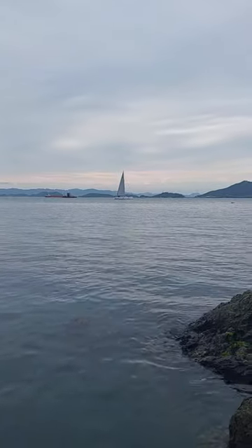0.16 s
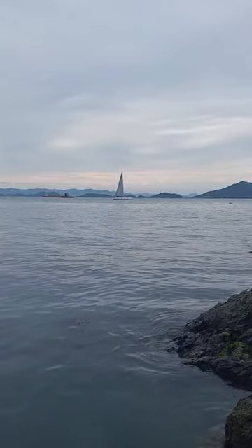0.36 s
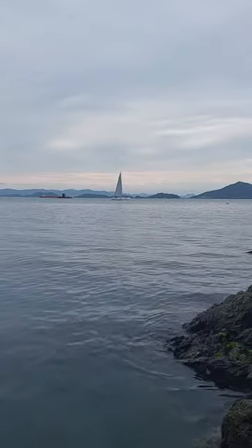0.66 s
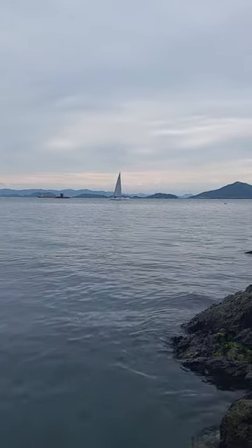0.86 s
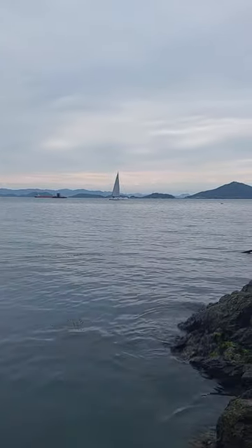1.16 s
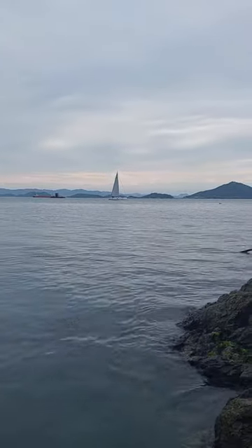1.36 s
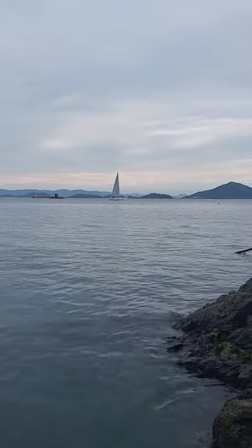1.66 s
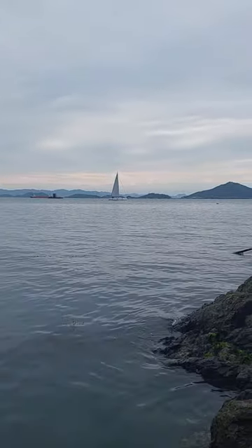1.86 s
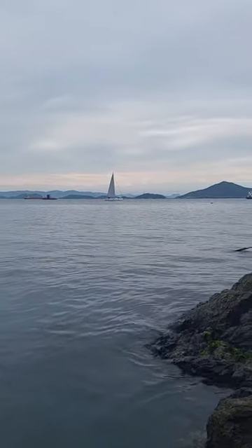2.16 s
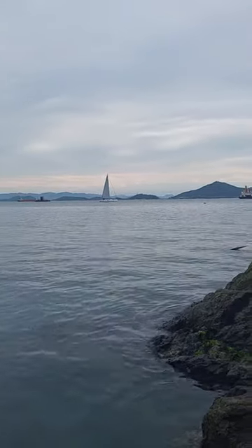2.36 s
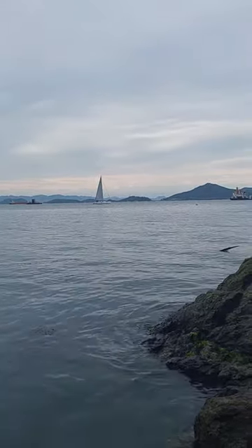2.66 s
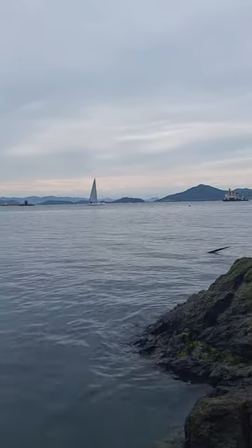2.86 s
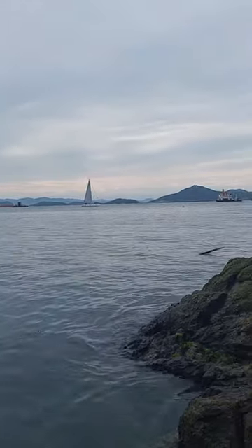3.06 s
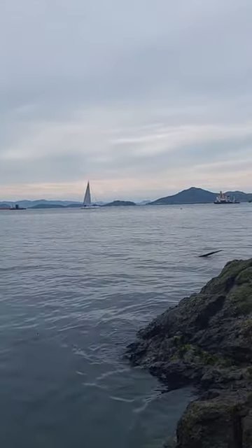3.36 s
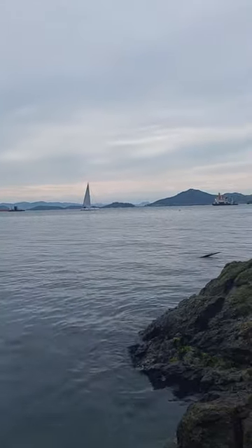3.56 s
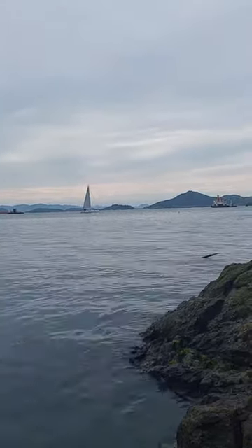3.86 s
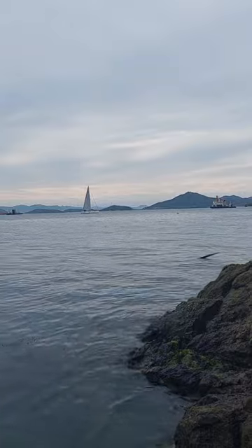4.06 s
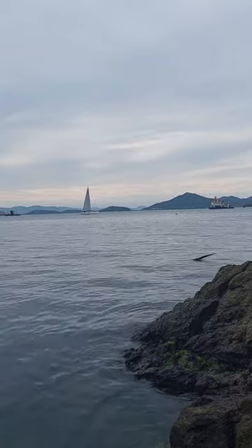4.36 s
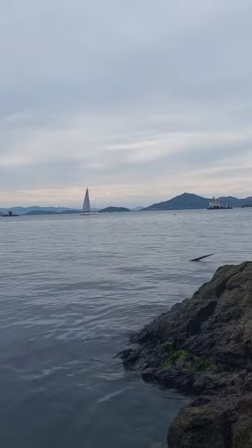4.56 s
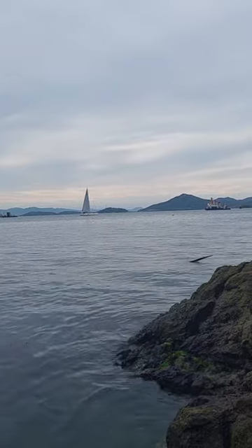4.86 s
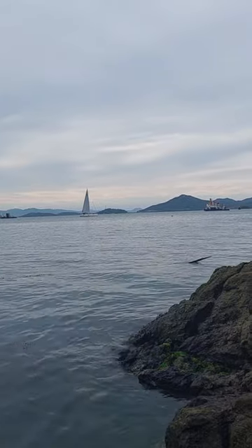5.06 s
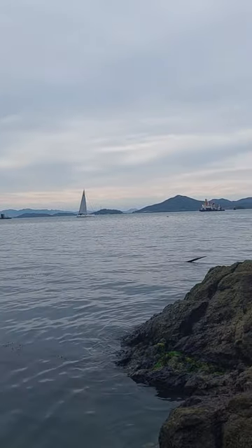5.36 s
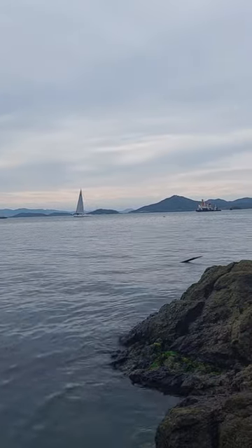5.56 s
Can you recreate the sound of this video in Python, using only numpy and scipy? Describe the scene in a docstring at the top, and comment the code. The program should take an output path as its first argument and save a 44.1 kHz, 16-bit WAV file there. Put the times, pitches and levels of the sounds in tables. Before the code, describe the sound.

Small waves lap and gurgle against a rock with bubbly plips and droplets, over a distant ship engine's low, wavering hum.

```python
"""A ship's engine hums and rumbles across a bay as small waves lap against a rock on the right, on a calm shore.
Two wavering tones in dull noise make the ship. Each lap folds air into the water: decaying sines ring as bubbles,
most rising in pitch, in swarms and singly, and random flurries of pops fizz as spray on the stone.
Narrow noise swells briefly on gliding pitches, droplets crack and splash, and hollows gulp.
Rock echoes, a far wash, a faint hiss and a light breeze fill the space."""
import sys
import numpy as np
from scipy import signal
from scipy.fft import rfft, irfft
from scipy.io import wavfile
from scipy.ndimage import uniform_filter1d

SR = 44100
rng = np.random.default_rng(int(sys.argv[2]) if len(sys.argv) > 2 else 0)


def bounce(signal):
    """Save signal as a 16-bit WAV file at the path given by the first command-line argument."""
    frames = np.transpose(np.atleast_2d(signal))
    limited = np.clip(frames, -1, 1)
    pcm = np.round(limited * 32767).astype(np.int16)
    wavfile.write(sys.argv[1], SR, pcm)


N = 251370
TIME = np.arange(N) / SR

# The ship's hum swelling and fading over the water, before a common trim and random fades:
# (time [s], firing line level [dB], octave line level [dB])
HUM_LEVELS = [(0.05, -46.5, -36), (0.18, -50, -49), (0.3, -54, -60), (0.55, -47, -46.5), (0.78, -52, -51),
              (0.87, -57, -38.5), (0.95, -66, -49), (1.01, -62, -33), (1.1, -67, -48), (1.27, -59, -55.5),
              (1.37, -45, -43), (1.55, -51, -45.5), (1.72, -49.5, -55), (1.85, -50.5, -49.5),
              (2.06, -55, -47), (2.25, -70, -76), (2.68, -61, -47.5), (2.83, -64, -61),
              (3.05, -50.5, -50.5), (3.35, -51, -48.5), (3.88, -56.5, -59.5), (4.8, -54.5, -43.5),
              (5.12, -52, -46.5), (5.25, -76, -73), (5.48, -57, -42), (5.7, -55, -56)]
# A rumble over the water that dies away, before its own small swells: (time [s], level [dB])
RUMBLE_LEVELS = [(0.05, -45), (0.5, -49), (1.0, -46.5), (1.38, -48.5), (1.6, -52), (1.95, -55.5),
                 (2.3, -58), (2.8, -64), (3.3, -55.5), (3.75, -58), (3.95, -63), (4.2, -58), (4.65, -55.5),
                 (5.3, -61), (5.6, -55.5)]
# Water that keeps running on the rock between laps, before surges and layer trims: (time [s], level [dB])
RUNOFF_LEVELS = [(0.1, -80), (0.6, -71.5), (1.15, -70), (1.9, -65), (2.5, -57), (2.8, -65), (3.3, -66),
                 (3.55, -65.5), (3.85, -71), (4.35, -68), (4.9, -65.5), (5.35, -75), (5.7, -74)]
# Rushes of water on the rock; the larger waves come in several:
# (time [s], length [s], strength [dB], deep gurgle against strength [dB], spray against strength [dB])
LAP_RUSHES = [(0.017, 0.063, -61.5, -1, -9), (0.088, 0.26, -57.5, -2.5, -11), (0.377, 0.041, -60, -12, -33),
              (0.744, 0.043, -63, 4.5, -20), (0.96, 0.066, -68.5, 14.5, 1.5), (1.285, 0.038, -62, 1, -4.5),
              (1.419, 0.2, -58, 1.5, -9.5), (1.646, 0.18, -59, 0, -35), (1.779, 0.079, -61.5, 0, -4.5),
              (2.031, 0.084, -52, -1.5, -12.5), (2.214, 0.028, -48, 2, -17), (2.268, 0.18, -54, 1, -7.5),
              (2.514, 0.025, -60, -12, -12), (2.857, 0.009, -50, -11, -9),
              (3.002, 0.087, -52.5, -10, -13.5), (3.125, 0.022, -44.5, -13, -8),
              (3.195, 0.099, -49, 0.5, -6), (3.28, 0.051, -49, 0.5, -13.5), (3.342, 0.062, -55, 7, -10.5),
              (3.423, 0.034, -58.5, 7.5, -3.5), (3.496, 0.02, -57, -7, -17), (3.952, 0.072, -70.5, 2, 2),
              (4.127, 0.12, -57.5, -2.5, -10), (4.345, 0.028, -63.5, -3, -19),
              (4.533, 0.018, -58.5, -5, -7), (4.617, 0.033, -57, -12, -9), (4.74, 0.083, -71.5, 11, 0.5),
              (4.816, 0.017, -51.5, 6, -7.5), (4.872, 0.056, -54, 7, -4.5), (4.992, 0.13, -58.5, 9.5, -6.5)]
# The largest single bubbles, strength before a common trim:
# (time [s], starting pitch [Hz], strength [dB], time to decay 60 dB [s], glide over that time [share of pitch])
SINGLE_BUBBLES = [(0.009, 1260, -38.5, 0.03, 0.26), (0.095, 1420, -36.5, 0.049, .3),
                  (0.132, 1190, -38, 0.056, 0.94), (0.153, 794, -38, 0.064, 0.96),
                  (0.24, 1570, -42, 0.018, 0.13), (0.427, 1694, -43.5, 0.022, 0.077),
                  (0.441, 1430, -45, 0.023, -0.099), (0.753, 1435, -42.5, 0.055, 0.15),
                  (0.9042, 1030, -38, .015, 0.32), (0.965, 1260, -32, 0.0049, 0.14),
                  (1.291, 863, -43, 0.047, -0.069), (1.302, 1680, -47.5, 0.071, -.03),
                  (1.385, 1310, -45.5, .024, 0.22), (1.428, 1690, -41, 0.034, -0.18),
                  (1.468, 2140, -41.5, 0.015, 0.11), (1.4749, 664, -36.5, 0.01, 0.17),
                  (1.486, 1340, -37.5, 0.021, -0.011), (1.5426, 1337, -36, 0.035, -0.089),
                  (1.575, 1490, -42, 0.023, 0.036), (1.774, 1860, -36.5, 0.012, 0.3),
                  (1.862, 1485, -42.5, 0.024, 0.26), (2.0261, 1495, -31.5, 0.041, 0.077),
                  (2.06, 850, -41, 0.026, 0.39), (2.095, 1300, -33.5, 0.033, -0.14),
                  (2.16, 1380, -42.5, .03, -0.14), (2.1875, 1750, -36.5, 0.027, 0.26),
                  (2.2195, 1720, -25, 0.011, 0.076), (2.2192, 1045, -30.5, 0.01, 0.093),
                  (2.236, 1800, -41, 0.014, 0.4), (2.238, 760, -41, .025, 0.23),
                  (2.306, 1670, -39, 0.032, 0.04), (2.3277, 1062, -31.5, 0.043, 0.67),
                  (2.3398, 1360, -31, 0.017, 0.73), (2.4396, 1630, -40.5, 0.024, 0.15),
                  (2.489, 1450, -29, 0.024, -0.097), (2.503, 1510, -29.5, 0.01, 0.38),
                  (2.6633, 1480, -41.5, 0.04, 0.18), (2.8598, 1500, -33.5, 0.02, 0.37),
                  (2.875, 838, -47.5, 0.088, 0.052), (3.0069, 1150, -46, 0.049, 0.075),
                  (3.077, 1410, -39, .025, 1), (3.117, 1465, -29.5, 0.051, .05),
                  (3.1389, 938, -37, 0.085, -.08), (3.1828, 1087, -33, 0.036, .1),
                  (3.183, 2750, -40, .012, 0.2), (3.2029, 890, -33.5, .025, -0.076),
                  (3.2363, 1515, -33.5, 0.034, 0.24), (3.249, 964, -30, 0.034, 0.067),
                  (3.2892, 1420, -32.5, 0.034, 0.17), (3.291, 910, -36, 0.03, 0.16),
                  (3.307, 3050, -37.5, 0.011, -0.04), (3.336, 1300, -38, 0.028, .1),
                  (3.406, 445, -34.5, 0.12, 0.2), (3.443, 900, -34, 0.025, 0.15),
                  (3.453, 1030, -28, 0.021, 0.15), (3.4869, 578, -40.5, 0.062, .1),
                  (3.488, 2280, -41, 0.017, 0.15), (3.5, 467, -40.5, 0.043, -0.17),
                  (3.625, 2290, -45, 0.027, 0.16), (3.7142, 1683, -42, 0.052, 0.28),
                  (3.8157, 1740, -51.5, 0.044, 0.34), (3.98, 1970, -34.5, 0.0048, .2),
                  (4.16, 956, -37.5, 0.064, 0.9), (4.1957, 2300, -34.5, 0.0097, 0.28),
                  (4.258, 4430, -47.5, 0.023, 0.15), (4.273, 1220, -50, 0.036, 0.22),
                  (4.352, 1514, -51, 0.054, 0.38), (4.434, 1420, -44.5, .022, 0.52),
                  (4.535, 612, -55, 0.13, .05), (4.657, 1545, -42.5, .026, 0.089),
                  (4.688, 1732, -43, 0.061, -0.03), (4.8185, 920, -36, 0.024, -.6),
                  (4.819, 1570, -34.5, .015, 0.054), (4.8264, 1480, -35, 0.024, -0.27),
                  (4.828, 603, -42.5, 0.14, 0.11), (4.884, 736, -41.5, 0.035, .1),
                  (4.977, 1155, -37.5, 0.049, 0.4), (5.0476, 1565, -25.5, .012, 0.38),
                  (5.114, 763, -45.5, 0.085, -0.0081), (5.3372, 1250, -45, 0.011, 0.13)]
# Short narrow swells of noise on gliding pitches: low ones like ship or wind rumble, higher ones like
# gurgling water: (time [s], length [s], level [dB], first pitch [Hz], last pitch [Hz])
GLIDING_SWELLS = [(0.044, 0.027, -53.5, 258.4, 251), (0.081, .06, -67, 680, 814),
                  (0.147, 0.039, -57, 410, 374), (0.35, 0.05, -55, 231.2, 220.4),
                  (0.365, 0.041, -50, 176, 185), (0.568, 0.021, -68.5, 509, 505),
                  (0.779, 0.063, -69, 449, 475), (0.916, 0.049, -50.5, 225.2, 219),
                  (1.177, 0.068, -51, 165, 185), (1.052, 0.062, -62.5, 1530, 1490),
                  (1.095, 0.14, -62.5, 1215, 1064), (1.074, 0.18, -63, 838, 813),
                  (1.304, .03, -60.5, 402, 440), (1.347, 0.038, -62.5, 707, 790),
                  (1.441, 0.059, -51.5, 348, 360), (1.445, 0.046, -61, 657, 682),
                  (2.02, 0.096, -66.5, 617, 565), (3.183, 0.1186, -60.5, 590, 690),
                  (3.434, 0.046, -63, 640, 686), (4.46, 0.049, -66.5, 1300, 1057),
                  (4.605, 0.064, -64, 1465, 1720), (4.725, 0.027, -62.5, 960, 1116),
                  (4.928, 0.035, -63.5, 620, 810)]
# The hardest droplets slapping on water or stone: (time [s], peak [dB], centre [Hz], left against right [dB])
DROPLETS = [(0.0468, -47.5, 12000, -5), (0.6037, -51.5, 7400, -7), (0.9058, -54, 7840, -9),
            (0.938, -45.5, 8400, -12), (0.9657, -40, 4930, -16), (1.2202, -50, 8300, -22),
            (1.322, -45, 5040, -2), (1.519, -39, 10400, 1), (1.586, -41.5, 9250, -6),
            (1.775, -56, 3060, -4), (1.8923, -39.5, 11400, 4), (2.056, -43, 7540, -2),
            (2.3804, -26.5, 2690, -16.5), (2.5172, -35, 6000, -10.5), (2.764, -45, 5100, -5),
            (2.8635, -30.5, 4500, -3), (2.885, -42.5, 4240, -1), (3.007, -41.5, 3030, -6),
            (3.021, -42.5, 2920, -3), (3.0686, -41, 3670, -7), (3.141, -31.5, 2880, 5),
            (3.153, -41, 7040, 0), (3.215, -39, 5200, 1), (3.25, -44, 4870, -3), (3.355, -43, 3420, -2),
            (3.2919, -36, 7400, 8), (3.6232, -48.5, 4270, -8), (4.1703, -44, 3600, -3),
            (4.199, -43, 3730, -1), (4.4378, -58, 3160, -14), (4.5503, -40.5, 10700, -2),
            (4.5982, -44.5, 4500, -8), (4.8184, -42, 5000, -4), (4.873, -42, 6540, -1),
            (4.892, -37, 3800, -11), (4.925, -40, 3000, -2), (5.1, -48, 4830, -3.5),
            (5.5064, -56, 3950, -10), (5.6042, -60, 3900, -14)]
# Hollow gulps under the rock: (time [s], starting pitch [Hz], strength [dB], time to decay 60 dB [s])
HOLLOW_GULPS = [(2.3801, 120, -29, 0.056), (2.3804, 340, -25.5, 0.0092), (2.409, 153, -31, 0.019),
                (4.9982, 310, -24.5, 0.02)]

# Tone colour of the ship's exhaust noise: (frequency [Hz], relative level [dB])
EXHAUST_SPECTRUM = [(38, -23), (52, 12.5), (80, -9), (105, 5.5), (160, -14), (300, -14)]
# Tone colour of the rumble: (frequency [Hz], relative level [dB])
RUMBLE_SPECTRUM = [(70, -16), (105, 4.5), (165, 3), (230, -0.5), (310, -7.5), (450, -28.5), (900, -32)]
# Tone colour of the far wash: (frequency [Hz], relative level [dB])
FAR_SPECTRUM = [(300, 19), (600, 7.5), (1000, -3), (1450, 14.5), (2200, -12), (4000, -23)]
# Tone colour of the steady hiss: (frequency [Hz], relative level [dB])
HISS_SPECTRUM = [(2500, -6), (4500, -10), (6300, 5.5), (8000, 10.5), (10000, 1), (13000, 4.5), (16000, 2.5)]
# Tone colour of the blended bubbles: (frequency [Hz], relative level [dB])
CHURN_SPECTRUM = [(450, -15), (650, 0.5), (950, 1), (1500, 6), (2000, 2.5), (3000, -12.5)]
# Tone colour of the fizzing spray: (frequency [Hz], relative level [dB])
SPRAY_SPECTRUM = [(1800, 9.5), (2600, 3.5), (4300, 4.5), (6300, 1), (8000, 1.5), (10000, -2), (12500, 4),
                  (15900, 0.5)]

FIRING_HZ = 62.2                         # the pitch wavers around this
FADE_DB, FADES_PER_S = 2, 7.8            # each engine line fades on its own
RUMBLE_SWELL_DB, RUMBLE_SWELLS_PER_S = 0.37, 2.9
FAR_DB, HISS_DB = -74.5, -81.5
RUNOFF_GURGLE_DB, RUNOFF_SPRAY_DB = -6.5, -6.5  # against the runoff's trickle
LAP_ATTACK_S, LAP_RELEASE_S = 0.0087, 0.08      # times for a change of 20 dB
LAP_SAG_DB_PER_S = 10.5                         # slow loss while a rush lasts
SURGE_DB, SURGES_PER_S = 2, 8.7                 # the flow is uneven
PORT_LAG_S = .00026                             # sound from the right reaches the left microphone later
CUTOFF_HZ = 16300


def from_db(db):
    """Decibels to gain."""
    return 10 ** (np.asarray(db) / 20)


def rms_one(x):
    """Scale to unit rms."""
    return x / np.sqrt(np.mean(x ** 2) + 1e-20)


def in_time(rows):
    """Draw one curve over time for each level column of a table."""
    s, *columns = np.transpose(rows)
    return [np.interp(TIME, s, c) for c in columns]


def drift(rate):
    """Smooth random wandering with a spread of 1; a higher rate [Hz] wanders faster."""
    hop = 40  # samples between the points of the slow curve
    r = np.exp(-2 * np.pi * rate * hop / SR)
    raw = rng.standard_normal(N // hop + 2002)
    slow = signal.lfilter([1], [1, -2 * r, r * r], raw)[2000:]  # drop the filter's start-up
    return np.interp(np.arange(N) / hop, np.arange(len(slow)), rms_one(slow))


def band(x, low_hz, high_hz, order=2):
    """Butterworth band-pass, its upper edge held below 0.45 of the sample rate."""
    edges = [low_hz, min(high_hz, .45 * SR)]
    sos = signal.butter(order, edges, "band", fs=SR, output="sos")
    return signal.sosfilt(sos, x + 1e-18)


def coloured(x, colour):
    """Give a signal a smooth spectrum that falls off beyond both ends; rms 1."""
    hz, level_db = np.transpose(colour)
    freq = np.arange(N // 2 + 1) * SR / N + 1e-3
    ends = np.minimum(1, freq / hz[0]) * np.minimum(1, hz[-1] / freq)
    gain = from_db(np.interp(np.log(freq), np.log(hz), level_db)) * ends ** 4
    return rms_one(irfft(rfft(x) * gain, N))


def patchy(x, low_hz, high_hz, flicker_db, flickers_per_s, count):
    """Split a sound into bands that each swell and fade on their own; rms 1."""
    edges = np.geomspace(low_hz, high_hz, count + 1)
    total = 0
    for k, (low, high) in enumerate(zip(edges, edges[1:])):
        flicker = from_db(flicker_db * drift(flickers_per_s))
        total = total + flicker * band(x, low, high) * (-1) ** k  # neighbours in opposite polarity
    return rms_one(total)


def stereo_noise(side_db):
    """White noise common to both sides, plus an opposed part at side_db against it."""
    mid, side = rng.standard_normal((2, N))
    return mid + from_db(side_db) * side * [[1], [-1]]


def add(out, s, sound, pan_db, lag_s):
    """Mix a sound in at a time and direction; negative pan leans right, and lag delays the left."""
    left = (s + lag_s / 2, from_db(pan_db / 2))
    right = (s - lag_s / 2, from_db(-pan_db / 2))
    for channel, (at, gain) in enumerate([left, right]):
        i = int(np.clip(at * SR, 0, N))
        out[channel, i:i + len(sound)] += gain * sound[:N - i]


def ship(lines_db=-2, noise_db=-56, waver=0.0034):
    """Two engine lines waver on their way over the water, in dull exhaust noise and rumble."""
    first_db, second_db = [
        level_db + lines_db + FADE_DB * drift(FADES_PER_S) for level_db in in_time(HUM_LEVELS)]
    phase = 2 * np.pi * np.cumsum(FIRING_HZ * (1 + waver * drift(1.44))) / SR
    first = from_db(first_db) * np.sin(phase + 0.39 * drift(7.4))
    second = from_db(second_db) * np.sin(2 * phase + 0.5 * drift(4.2))
    lines = np.sqrt(2) * (first + second)  # a sine of rms 1 peaks at root 2
    exhaust = from_db(noise_db) * coloured(stereo_noise(-27.5), EXHAUST_SPECTRUM)
    rumble_db = in_time(RUMBLE_LEVELS)[0] + RUMBLE_SWELL_DB * drift(RUMBLE_SWELLS_PER_S)
    uneven = patchy(stereo_noise(-12.0), 70.8, 883, 2.04, 7.4, count=8)
    rumble = from_db(rumble_db) * coloured(uneven, RUMBLE_SPECTRUM)
    return (lines + exhaust + rumble) * from_db([[-.45], [.45]])


def breeze(level_db=-62, gust_db=3):
    """Light air buffets each microphone on its own: low noise in slow gusts."""
    buffeting = rms_one(band(rng.standard_normal((2, N)), 40, 109, order=3))
    return from_db(level_db + gust_db * drift(2.9)) * buffeting


def far_wash():
    """The far wash of the shore: a steady bed of wide coloured noise."""
    return from_db(FAR_DB) * coloured(stereo_noise(0.26), FAR_SPECTRUM)


def steady_hiss():
    """A faint, wide, unchanging hiss of bright noise."""
    return from_db(HISS_DB) * coloured(stereo_noise(-0.54), HISS_SPECTRUM)


def swell_shape(s, length_s):
    """Gain of one rush or swell: it rises quickly, sags while it lasts and dies away."""
    rising = np.maximum(s - TIME, 0) / LAP_ATTACK_S
    falling = np.maximum(TIME - s - length_s, 0) / LAP_RELEASE_S
    sag_db = LAP_SAG_DB_PER_S * np.clip(TIME - s, 0, length_s)
    return from_db(np.maximum(-20 * (rising + falling) - sag_db, -100))


def wash():
    """Levels in dB of gurgle, trickle and spray: the laps on top of the runoff, surging unevenly."""
    runoff_trims = np.array([[RUNOFF_GURGLE_DB], [0], [RUNOFF_SPRAY_DB]])
    power = from_db(in_time(RUNOFF_LEVELS)[0] + runoff_trims) ** 2
    for s, length_s, strength_db, gurgle_db, spray_db in LAP_RUSHES:
        layers = from_db(strength_db + np.array([[gurgle_db], [0], [spray_db]]))
        power = power + (layers * swell_shape(s, length_s)) ** 2
    return 10 * np.log10(power) + SURGE_DB * drift(SURGES_PER_S)


def bubble(hz, t60, rise, onset_s=0.0013):
    """A pinched-off bubble rings down, its pitch gliding as it nears the surface or swells."""
    t = np.arange(int(t60 * SR) + 2) / SR
    envelope = (1 - np.exp(-t / onset_s)) * np.exp(-np.log(1000) * t / t60)
    return envelope * np.sin(2 * np.pi * hz * (t + rise * t * t / 2))


def swarm(low_hz, high_hz, pan_db, count, size=4):
    """Air pockets along the waterline each break into a few bubbles of like pitch; rms near 1."""
    out = np.zeros((2, N))
    for k, (when, pitch, strength, place) in enumerate(rng.random((count, 4))):
        pocket_s = (k + when - 1) / count * N / SR
        pocket_hz = low_hz * (high_hz / low_hz) ** pitch
        for wait, detune, life, rise in rng.random((size, 4)):
            hz = pocket_hz * (.88 + .24 * detune)
            t60 = (18 + 32 * life) / hz  # a few dozen cycles
            ring = bubble(hz, t60, .22 * rise / t60, onset_s=.7 / hz)
            sound = from_db(11 * strength ** 2 - 6 * wait) * ring
            add(out, pocket_s + .025 * wait, sound, pan_db * (.5 + place), PORT_LAG_S * (0.66 + place))
    power = uniform_filter1d(np.mean(out ** 2, axis=0), size=SR // 12)
    return out / np.sqrt(power + 1e-6)   # the flow of air is even over a twelfth of a second


def plinks(spray_db, pivot_db=-66, steepness=0.5, level_db=-6):
    """Bright bubble plinks at 2 to 6 kHz, whose level rises and falls more steeply than the spray."""
    steep_db = spray_db + steepness * (spray_db - pivot_db)
    return from_db(steep_db + level_db) * swarm(2116, 5630, pan_db=-3.5, count=1700)


def churn(pan_db=-3, spread_db=-8):
    """Bubbles too many to tell apart blend into the body of the wash; rms 1."""
    out = from_db(spread_db) * rng.standard_normal((2, N))
    add(out, 0, rng.standard_normal(N), pan_db, PORT_LAG_S)
    return coloured(out, CHURN_SPECTRUM)


def spray(pan_db=-1.5, hiss_db=-12, grain_db=2.0, count=5):
    """Tiny bubbles burst in quick flurries at several places on the stone, over a fine hiss; rms 1."""
    out = np.zeros((2, N))
    for place in np.linspace(0, 1, count):
        sizes = from_db(4.0 * np.minimum(rng.exponential(1, N), 4.5)) * rng.choice([-1, 1], N)
        bursts = rng.random(N) < 430 / SR  # about 430 a second at each place
        add(out, 0, sizes * bursts, pan_db * 2 * place, PORT_LAG_S * (.75 + 0.52 * place))
    flurries = from_db(grain_db * drift(110))
    crackle = flurries * (rms_one(out) + from_db(hiss_db) * stereo_noise(0))
    return coloured(patchy(crackle, 1800, 16500, 2.2, 22, count=10), SPRAY_SPECTRUM)


def plops(level_db=-1.0, pan_db=-10.5, daughter_db=-15, scatter=0.202, linger_s=0.03, onset_share=0.06):
    """Bubbles close to the rock ring singly, each shedding fainter, shorter ones."""
    out = np.zeros((2, N))
    chances = rng.random((len(SINGLE_BUBBLES), 4, 2))  # four daughters each
    for (s, hz, peak_db, t60, glide), daughters in zip(SINGLE_BUBBLES, chances):
        pan = pan_db * min(hz / 1300, 1.2)   # long waves bend round the microphone's body
        parent = bubble(hz, t60, glide / t60, onset_share * t60)
        add(out, s, from_db(peak_db + level_db) * parent, pan, PORT_LAG_S)
        for wait, size in daughters:
            daughter_hz = hz * (1 + scatter * (3 * size - 1.25))
            daughter = bubble(daughter_hz, t60 / 2, glide / t60)
            gain = from_db(peak_db + daughter_db * (1 + wait / 2))
            add(out, s + wait * linger_s, gain * daughter, pan, PORT_LAG_S)
    return out


def rock_echoes(x, t60=0.19, count=24):
    """The rough rock faces scatter a few quick reflections to each side."""
    out = np.zeros((2, N))
    for channel in range(2):
        for delay in rng.uniform(.003, 0.047, count):
            i = int(delay * SR)
            gain = rng.choice([-1, 1]) * np.exp(-np.log(1000) * delay / t60)
            out[channel, i:] += gain * x[channel, :N - i]
    return band(out, 160, .45 * SR, order=1) / np.sqrt(count)


def gliding_swells(width=0.072, pan_db=-6):
    """Short swells of narrow noise on gliding pitches: two slow random curves modulate a sine and cosine."""
    out = np.zeros((2, N))
    for s, length_s, level_db, first_hz, last_hz in GLIDING_SWELLS:
        hz = np.interp(TIME, [s, s + length_s], [first_hz, last_hz])
        phase = 2 * np.pi * np.cumsum(hz) / SR
        shape = swell_shape(s, length_s)
        rate = width * first_hz  # width is a share of the pitch
        ringing = shape * (drift(rate) * np.cos(phase) + drift(rate) * np.sin(phase))
        sound = from_db(level_db) * shape.std() * rms_one(ringing)
        add(out, 0, sound, pan_db * min(first_hz / 1300, 1), PORT_LAG_S)
    return out


def drops(ring_s=0.0005, splash_s=0.0067, splash_db=-20, firm_db=-38):
    """A droplet cracks for about a millisecond and throws a short, grainy splash."""
    out = np.zeros((2, N))
    t = np.arange(SR // 14) / SR
    for s, peak_db, hz, pan_db in DROPLETS:
        crack = np.exp(-t / ring_s) * (np.sin(2 * np.pi * hz * t) + 0.37 * rng.standard_normal(len(t)))
        grains = rng.standard_normal(len(t)) * rng.exponential(1.0, len(t))
        soft_db = .5 * (firm_db - peak_db)   # hard hits on stone are dry, soft ones on water are splashy
        splash = from_db(splash_db + soft_db) * np.exp(-t / splash_s) * grains
        sound = band(crack + splash, hz / 3, hz * 15.0, order=1)
        add(out, s, from_db(peak_db) * sound / np.abs(sound).max(), pan_db, PORT_LAG_S)
    return out


def gulps(sink=0.7, pan_db=-10.0, onset_s=0.0015):
    """Water slaps a hollow shut: the trapped air thumps for a few cycles and sinks in pitch."""
    out = np.zeros((2, N))
    for s, hz, peak_db, t60 in HOLLOW_GULPS:
        add(out, s, from_db(peak_db) * bubble(hz, t60, -sink / t60, onset_s), pan_db, PORT_LAG_S)
    return out


def scene():
    """The ship, breeze, far wash and hiss, with water at the rock, gliding swells and their echoes."""
    background = ship() + breeze() + far_wash() + steady_hiss()
    gurgle_db, trickle_db, spray_db = wash()
    # bubble swarms from deep to bright
    gurgle = from_db(gurgle_db - 10.5) * swarm(560.4, 1091, pan_db=1.0, count=400)
    trickle = from_db(trickle_db - 3.5) * swarm(1020, 2000, pan_db=-5, count=560)
    tinkle = from_db((trickle_db + spray_db) / 2 - 14.0) * swarm(1835, 4290, pan_db=-9.0, count=520)
    prickle = from_db(spray_db - 3.0) * swarm(4080, 16000, pan_db=-6, count=1000)
    body = from_db((gurgle_db + trickle_db) / 2 - 10) * churn()
    fizz = from_db(spray_db - 0.34) * spray()
    swarms = gurgle + trickle + tinkle + prickle + plinks(spray_db)
    echoing = swarms + body + plops() + gliding_swells()
    echoes = from_db(-1.0) * rock_echoes(echoing)
    return background + echoing + echoes + fizz + drops() + gulps()


def record(dry):
    """Cut the top steeply with an elliptic low-pass."""
    sos = signal.ellip(10, .1, 70, CUTOFF_HZ, fs=SR, output="sos")
    return signal.sosfilt(sos, dry)


dry = scene()
out = record(dry)
bounce(out)
```